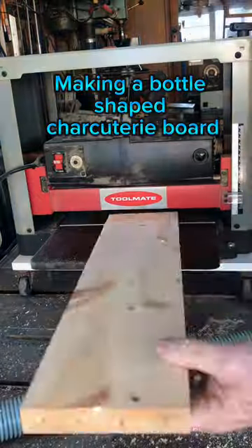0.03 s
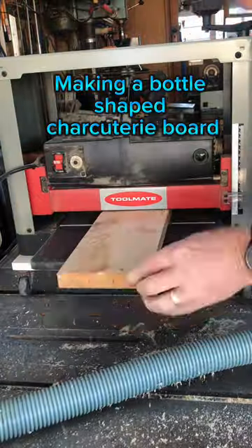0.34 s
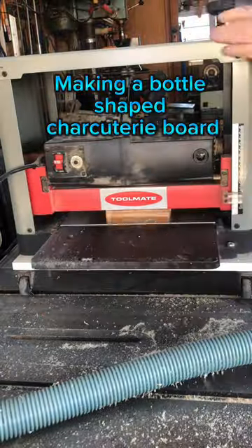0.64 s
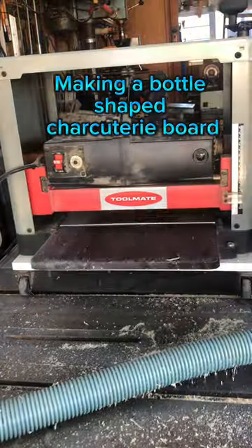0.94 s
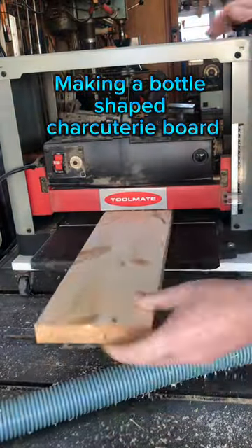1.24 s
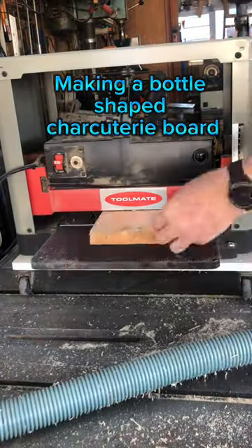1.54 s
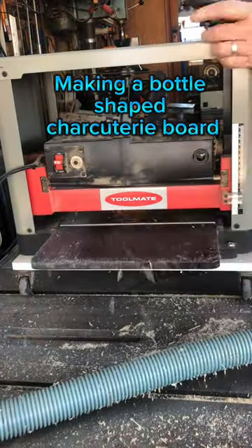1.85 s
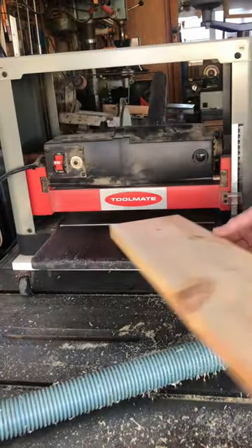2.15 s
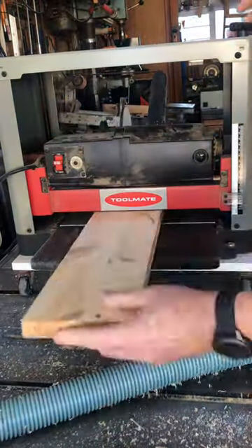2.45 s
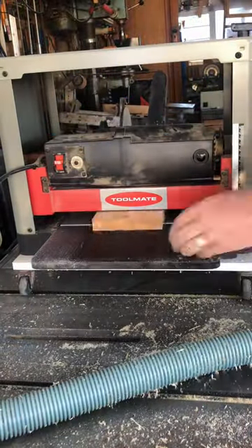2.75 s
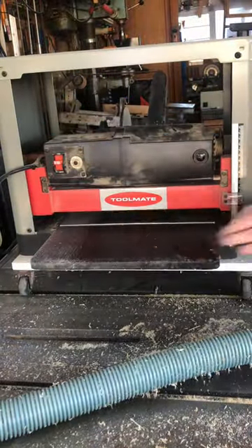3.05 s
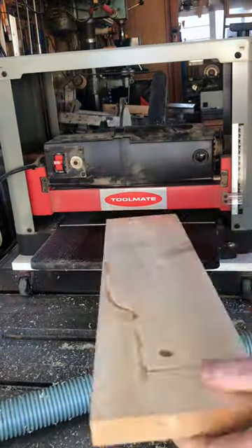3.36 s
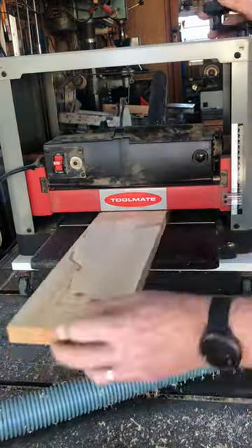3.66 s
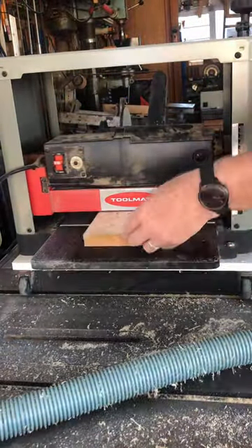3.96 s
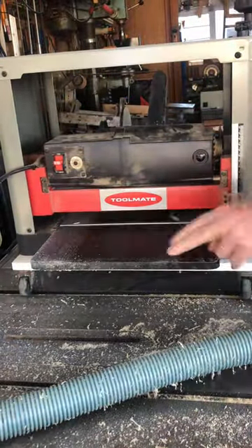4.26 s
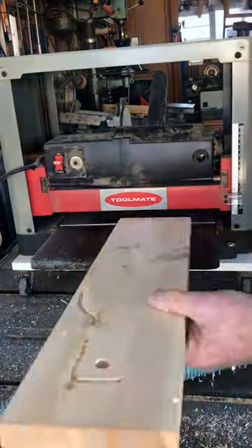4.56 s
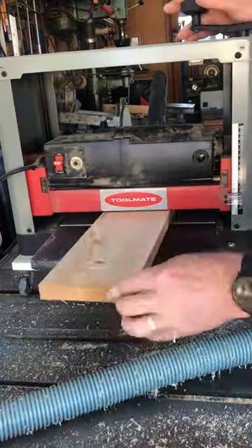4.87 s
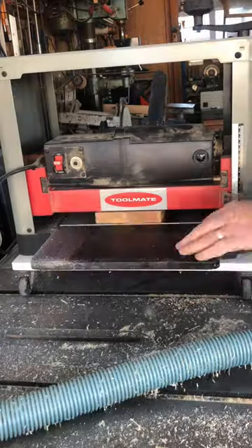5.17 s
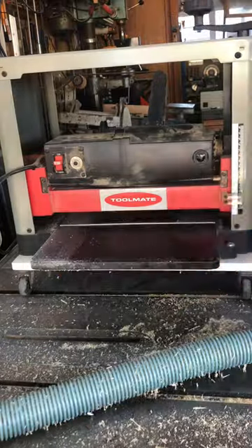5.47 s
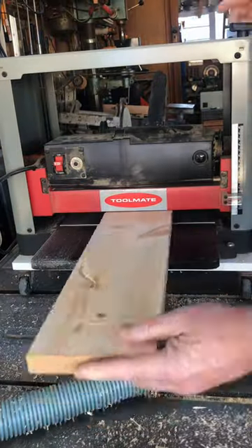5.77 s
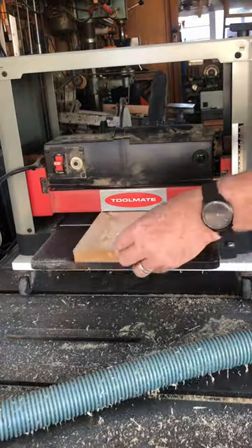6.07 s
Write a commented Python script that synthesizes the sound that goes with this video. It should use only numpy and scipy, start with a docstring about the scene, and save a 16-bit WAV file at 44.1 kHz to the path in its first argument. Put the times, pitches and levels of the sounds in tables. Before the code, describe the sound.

A benchtop wood planer runs in a workshop, sped up so that it whines at a very high pitch over rushing air. Six boards go through in quick succession. Each drags the pitch down for about half a second of shrieking, rasping knives, hissing chips and thin chirping squeals. Between boards the whine climbs and swells back. The sound is mono and close, with very little echo.

```python
"""A wood planer, sped up

Six boards go through a benchtop planer in six seconds, heard in mono. Running free, it whines over a
rush of air. Each board drags the motor down while the spinning knives shriek and spray chips. At this
speed their highest overtones pass half the sample rate and fold back down as criss-crossing chirps."""
import sys
import numpy as np
from scipy import signal
from scipy.fft import rfft, irfft, next_fast_len
from scipy.io import wavfile
from scipy.ndimage import uniform_filter1d

SR = 44100
rng = np.random.default_rng(int(sys.argv[2]) if len(sys.argv) > 2 else 0)


def file_out(sig):
    """Save sig as 16-bit WAV at sys.argv[1]."""
    # one column per channel
    cols = np.atleast_2d(sig).T
    # limit, then scale
    lim = np.clip(cols, -1, 1)
    pcm = np.round(lim * 32767).astype(np.int16)
    wavfile.write(sys.argv[1], SR, pcm)


N = 270774

# The knife rate is the number of knife strikes a second. Levels in the tables are relative.
# Each board's pass, and how far it turns down the free-running sound: start_s, end_s, dip_db
BOARD_PASSES = [(.254, 0.79, 22.5), (1.266, 1.876, 22.5), (2.426, 3.006, 20.5), (3.694, 4.237, 19),
                (4.829, 5.333, 19), (5.851, 6.202, 20)]
# The knife rate with no board, creeping up: time_s, rate_hz
FREE_RATE = [(0, 3385), (1.2, 3410), (2.4, 3427), (3.5, 3450), (4.7, 3469), (6, 3461)]
# The knife rate that the wood pulls towards, one list per board: time_s, rate_hz
CUTTING_RATES = [
    [(0.254, 2795), (0.328, 2668), (0.382, 2471), (0.473, 2725), (0.542, 2435), (0.587, 2526),
     (0.619, 2286), (0.635, 2656), (0.746, 2469), (0.791, 2301)],
    [(1.266, 2810), (1.288, 2433), (1.322, 2453), (1.415, 2264), (1.455, 2487), (1.524, 2557),
     (1.578, 2248), (1.691, 2346), (1.704, 2570), (1.81, 2404), (1.879, 2156)],
    [(2.426, 3018), (2.443, 2545), (2.524, 2374), (2.576, 2333), (2.618, 2543), (2.687, 2574),
     (2.734, 2334), (2.831, 2350), (2.853, 2568), (2.931, 2459), (3.005, 2293)],
    [(3.694, 2996), (3.704, 2397), (3.822, 2441), (3.939, 2436), (3.96, 2647), (3.973, 2720), (4.042, 2701),
     (4.105, 2621), (4.133, 2802), (4.238, 2827)],
    [(4.829, 2718), (4.868, 2784), (4.972, 2536), (5.028, 2488), (5.073, 2731), (5.133, 2635),
     (5.177, 2516), (5.224, 2702), (5.276, 2733), (5.333, 2697)],
    [(5.851, 1898), (5.907, 2420), (5.941, 2362), (5.971, 2410), (6.018, 2241), (6.068, 2325), (6.13, 2316)],
]
# Tones of the spinning block that holds the knives: multiple_of_knife_rate, level_db
CUTTER_TONES = [(1 / 2, -15.6), (1, -2.5), (2, -12), (3, -11.5), (4, -20)]
# Tone of the belt-driven motor: multiple_of_motor_rate, level_db
MOTOR_TONES = [(1, -9.5)]
# Fainter whirrs of the drive: multiple_of_knife_rate, level_db
DRIVE_TONES = [(1.043, -17), (1.305, -14.5)]
# How well the casing passes on the motor and drive: pitch_hz, gain_db
CASING_GAIN = [(2900, -7), (3400, -8.5), (3680, 6.5), (3900, 9), (4400, -1)]
# The tone colour of the rushing air: pitch_hz, level_db
AIR_COLOUR = [(15, -42), (25, -9.5), (241, -10), (333, -9.5), (472, -9.5), (1350, -11), (1680, -8),
              (1820, -10), (3200, -5), (3860, -6.5), (4190, -6), (5790, -10), (8680, -7), (14500, -7.5),
              (15700, -6.5)]
# The cooling blades' whistle at each knife rate: rate_hz, level_db
WHISTLE_LEVELS = [(2800, -10), (3100, 0), (3280, -7), (3450, -12)]
# How loud the parts of a cut are, one list per board: time_s, shriek_db, chips_db, rasp_db
CUT_LEVELS = [
    [(0.255, -18, -10.5, -40.5), (0.368, -24, -23, -35.5), (0.397, -15.5, -12, -45),
     (0.409, -18.5, -18, -37), (0.505, -18.5, -25, -41.5), (0.531, -13.5, -23, -40),
     (0.616, -21, -21.5, -32), (0.647, -22, -28, -40.5), (0.678, -14, -22, -45), (0.787, -21, -16.5, -33.5)],
    [(1.268, -17.5, -14, -34), (1.324, -22, -18.5, -37), (1.348, -18.5, -20, -43),
     (1.414, -21.5, -17.5, -33), (1.475, -21, -24, -38), (1.599, -17, -20.5, -37), (1.644, -18.5, -21, -30),
     (1.67, -23, -19, -35), (1.748, -23.5, -28, -42.5), (1.865, -16, -15, -34), (1.875, -43, -28, -62)],
    [(2.426, -16.5, -12, -37), (2.48, -23.5, -18.5, -37), (2.501, -17, -15.5, -36),
     (2.552, -21, -19, -34.5), (2.644, -20.5, -20.5, -33.5), (2.678, -14.5, -29, -42.5),
     (2.734, -19, -20, -29.5), (2.817, -18.5, -19.5, -36.5), (2.886, -22.5, -24.5, -44),
     (2.908, -21.5, -21, -37.5), (3.001, -20, -15, -34.5)],
    [(3.695, -19.5, -9.5, -40), (3.75, -21, -25.5, -40.5), (3.82, -27.5, -33, -36.5), (3.86, -38, -30, -42),
     (3.878, -27, -16.5, -31), (3.898, -19, -20.5, -45), (4.078, -25, -33.5, -41),
     (4.099, -22.5, -23.5, -39.5), (4.161, -28.5, -27, -44), (4.235, -24, -18.5, -35)],
    [(4.83, -19.5, -13.5, -37.5), (4.885, -28, -22, -41.5), (4.949, -25, -27, -40),
     (4.956, -25.5, -22, -40), (5.046, -19, -23, -45.5), (5.065, -24.5, -33, -44), (5.158, -27, -25, -38),
     (5.193, -22, -23, -45), (5.266, -24.5, -26.5, -48), (5.329, -20.5, -18, -35)],
    [(5.851, -20, -10, -34.5), (5.903, -19.5, -25, -47), (5.955, -30, -23, -39.5),
     (5.966, -23.5, -31.5, -40), (6.097, -22.5, -17.5, -37), (6.124, -38, -20.5, -39)],
]
# Peaks and dips that the shriek slides through: pitch_hz, width_hz, gain_db
SHRIEK_PEAKS = [(4630, 190, 6.5), (4887, 30, -6), (5176, 42, 4.5), (5243, 27, -17), (5145, 130, -1),
                (5740, 83, -35), (7324, 80, 15.5), (7700, 200, -4), (8480, 49, -16), (9670, 350, -6.5),
                (11260, 60, 22), (12370, 110, 9), (12800, 330, 7), (15500, 730, 0)]
# The knives' lowest tone, fading as they slow: rate_hz, level_db
STRIKE_LEVELS = [(2350, -39), (2700, -39), (3000, -37), (3400, -31)]
# Strength of the knives' high overtones: pitch_before_folding_hz, level_db
RASP_COLOUR = [(14000, 1), (30000, -0.5), (36000, 2.5), (42000, 0), (58000, 1), (80000, -10.5),
               (125000, -8), (160000, -4)]
# The tone colour of the flying chips: pitch_hz, level_db
CHIP_COLOUR = [(25, -3), (200, -3), (1200, -3), (2500, -1), (4500, -1.5), (7000, 0), (10000, -3),
               (15500, 2.5)]
# Brief squeals of single overtones: peak_s, fade_s, multiple_of_knife_rate, level_db
SQUEAL_EVENTS = [(0.31, .015, 13, -24), (0.33, 0.014, 14, -22.5), (0.574, 0.021, 16, -26),
                 (.577, 0.022, 15, -26), (0.755, 0.014, 17, -28), (1.351, 0.012, 16, -26),
                 (1.429, 0.025, 18, -28), (1.632, 0.013, 19, -35), (2.581, 0.011, 17, -24),
                 (2.591, 0.016, 18, -31.5), (2.789, 0.011, 18, -21.5), (2.79, .016, 16, -22.5),
                 (2.791, 0.013, 17, -26), (2.924, 0.031, 18, -37), (4.012, 0.053, 14, -37),
                 (4.07, .06, 12, -31), (5.125, 0.13, 12, -26.5), (5.312, 0.013, 16, -41)]

BELT_RATIO, COOLING_BLADES, FAN_HZ = 1.0849, 9, 3930  # the belt ratio is motor rate over knife rate
INERTIA_S, SPIN_UP_S, SPIN_UP_POWER = .05, .22, 3  # how the heavy cutter slows and recovers
EARLIER_EXIT_S, EARLIER_HZ = -.3, 2420  # at the start it is still recovering from an earlier board
AIR_DB, WHINE_DB = -29, -22.5
DIP_S, SWELL_DB_PER_S = .05, 85.5  # the free-running sound sinks fast, then swells back
HUM_LIFT = .35  # the share of that dip which the cutter's lowest hum is spared
SHRIEK_DB, CHIPS_DB, RASP_DB = 1, -3, -1  # added to CUT_LEVELS
GRAIN_DB, GRAIN_PER_S = 2, 45  # changing wood grain makes each overtone swell and fade by itself
RASP_LOW_HZ, TOP_HZ = 70, 15800  # the rasp thins out below the first; all sound stops at the second


def amp(db):
    """Turn decibels into a number to multiply by."""
    return np.exp(np.asarray(db) * (np.log(10) / 20))


def unit(x):
    """Scale a signal to an average strength (rms) of 1."""
    return x / np.sqrt(np.mean(x ** 2) + 1e-20)


def level_at(table, hz):
    """Read a level between a table's rows, on a log frequency scale."""
    table_hz, levels = np.transpose(table)
    return np.interp(np.log(hz + 1), np.log(table_hz), levels)


def curves(rows):
    """Turn each column after the time into one value per sample."""
    times, *columns = np.transpose(rows)
    return [np.interp(np.arange(N) / SR, times, column) for column in columns]


def wobble(per_s):
    """A wandering line of strength 1 through about per_s random points a second."""
    step = int(SR / per_s)
    points = rng.standard_normal((N // step + 2, 1)).astype(np.float32)
    ramp = np.arange(step, dtype=np.float32) / step
    return unit((points[:-1] + np.diff(points, axis=0) * ramp).ravel()[:N])


def filtered(x, gain_at):
    """Turn each frequency up or down by gain_at(hz)."""
    size = next_fast_len(N + 8192)
    return irfft(rfft(x, size) * gain_at(np.fft.rfftfreq(size, 1 / SR)), size)[:N]


def rush(colour, patchy_db):
    """Shaped noise of strength 1, with random louder and softer patches."""
    slices = signal.stft(rng.standard_normal(N), nperseg=512)[2]
    patches = uniform_filter1d(rng.standard_normal(slices.shape), size=5, axis=0)  # smooth over pitch
    patches = uniform_filter1d(patches, size=8, axis=1)  # and over time
    noise = signal.istft(slices * amp(patchy_db * unit(patches)), nperseg=512)[1][:N]
    return unit(filtered(noise, lambda hz: amp(level_at(colour, hz))))


def tone(phase, flutter_db, fuzz):
    """A tone of strength about 1 that flutters in level; fuzz roughens its pitch."""
    return np.sqrt(2) * unit(amp(flutter_db * wobble(45))) * np.sin(phase + fuzz * wobble(350))


def knife_rate():
    """Each board drags the heavy cutter towards a lower speed; once free, it spins up again."""
    t = np.arange(N) / SR
    free_hz, = curves(FREE_RATE)

    def spin_up(exit_s, exit_hz):
        recovery = (1 + np.maximum(t - exit_s, 0) / SPIN_UP_S) ** SPIN_UP_POWER
        return free_hz - (free_hz - exit_hz) / recovery

    hz = spin_up(EARLIER_EXIT_S, EARLIER_HZ)
    follow = 1 / (INERTIA_S * SR)
    for (start, end, _), targets in zip(BOARD_PASSES, CUTTING_RATES):
        cutting = (t >= start) & (t < end)
        entry_hz = hz[cutting][0]
        pull_hz = curves(targets)[0][cutting] - entry_hz
        hz[cutting] = entry_hz + signal.lfilter([follow], [1, follow - 1], pull_hz)
        hz = np.where(t < end, hz, spin_up(end, hz[cutting][-1]))
    return hz


def cutter_whine(phase, dip_db):
    """The spinning knife block whines over a hum at half the knife rate."""
    return sum(amp(db - (k < 1) * HUM_LIFT * dip_db) * tone(k * phase, flutter_db=.9, fuzz=.063 * k)
               for k, db in CUTTER_TONES)


def motor_whirr(knife_hz, phase):
    """The motor and drive turn with the cutter and sound through the casing."""
    shafts = [(k * BELT_RATIO, db) for k, db in MOTOR_TONES] + DRIVE_TONES
    return sum(amp(db + level_at(CASING_GAIN, k * knife_hz)) * tone(k * phase, flutter_db=1, fuzz=.11)
               for k, db in shafts)


def cooling_air(knife_hz, phase):
    """Air rushes and the motor's blades whistle. The whistle folds back, so it falls as they speed up."""
    whistle = tone(COOLING_BLADES * BELT_RATIO * phase, flutter_db=2, fuzz=.3)
    air = amp(7) * rush(AIR_COLOUR, patchy_db=1.03)
    return air + amp(level_at(WHISTLE_LEVELS, knife_hz)) * whistle


def fan(db):
    """A separate fan keeps its own speed whatever the load."""
    phase = 2 * np.pi * FAN_HZ * np.arange(N) / SR + 1.3 * wobble(18)
    return amp(db) * tone(phase, flutter_db=2, fuzz=.15)


def running_free(knife_hz, phase):
    """Cutter, motor and fan whine over the air they stir: faint after a board, then swelling back."""
    t = np.arange(N) / SR
    dip_db = sum(np.interp(t, [start, start + DIP_S, end, end + db / SWELL_DB_PER_S], [0, -db, -db, 0])
                 for start, end, db in BOARD_PASSES)
    cutter = cutter_whine(phase, dip_db)
    motor = motor_whirr(knife_hz, phase)
    air = cooling_air(knife_hz, phase)
    return amp(WHINE_DB + dip_db) * (cutter + motor + fan(db=-10.5)) + amp(AIR_DB + dip_db) * air


def board_contact(bite_s, release_s):
    """1 while a board is under the knives, 0 between boards."""
    t = np.arange(N) / SR
    return sum(np.clip((t - start) / bite_s + .5, 0, 1) * np.clip((end - t) / release_s + .5, 0, 1)
               for start, end, _ in BOARD_PASSES)


def knife_shriek(knife_hz, phase):
    """Tones at 2 to 6 times the knife rate swell and fade as they slide through peaks and dips."""
    multiples, grid_hz = np.arange(2, 7), np.arange(0, SR / 2, 10)
    colour_db = sum(db * np.exp(-((grid_hz - hz) / width) ** 2) for hz, width, db in SHRIEK_PEAKS)
    colour = amp(colour_db) * (grid_hz < TOP_HZ)
    gains = np.array([np.interp(k * knife_hz, grid_hz, colour) * amp(.5 * GRAIN_DB * wobble(GRAIN_PER_S))
                      for k in multiples])
    gains /= np.linalg.norm(gains, axis=0)  # together they keep a steady strength
    return sum(gain * tone(k * phase, flutter_db=2, fuzz=.14) for k, gain in zip(multiples, gains))


def knife_rasp(knife_hz, phase, first_bite):
    """The sharp strikes' high overtones fold back as chirps; as a board enters, a cluster zips out."""
    rasp = np.zeros(N)
    for k in range(7, 46):
        zip_db = 10 * np.exp(-((k - 14) / 2.2) ** 2) - 3.5
        db = level_at(RASP_COLOUR, k * knife_hz) + first_bite * zip_db + GRAIN_DB * wobble(GRAIN_PER_S)
        rasp += amp(db) * tone(k * phase, flutter_db=2.6, fuzz=.17)
    return filtered(rasp, lambda hz: hz / np.hypot(hz, RASP_LOW_HZ))


def chip_spray(first_bite):
    """Flying chips hiss; the hiss is turned down a little while the knives are still fast."""
    return amp(-3.5 * first_bite) * rush(CHIP_COLOUR, patchy_db=2)


def squeals(phase):
    """Hard spots in the wood make single overtones swell and fade."""
    t = np.arange(N) / SR
    return sum(amp(db) * np.exp(-((t - peak_s) / fade_s) ** 2) * tone(k * phase, flutter_db=4, fuzz=.3)
               for peak_s, fade_s, k, db in SQUEAL_EVENTS)


def planing(knife_hz, phase):
    """Knives strike the wood in sharp pulses: a base tone, a shriek, a rasp and a spray of chips."""
    shriek_db, chips_db, rasp_db = curves(np.vstack(CUT_LEVELS))
    phase = phase + .006 * wobble(300)  # the grain makes strikes uneven, blurring high overtones most
    first_bite = np.clip((knife_hz - 2550) / 500, 0, 1)  # 1 while still fast, as a board enters
    shriek = amp(shriek_db + SHRIEK_DB) * knife_shriek(knife_hz, phase)
    strike = amp(level_at(STRIKE_LEVELS, knife_hz)) * tone(phase, flutter_db=1.5, fuzz=.27)
    rasp = amp(rasp_db + RASP_DB) * knife_rasp(knife_hz, phase, first_bite)
    chips = amp(chips_db + CHIPS_DB) * chip_spray(first_bite)
    return shriek + strike + rasp + squeals(phase) + chips + fan(db=-47)


def workshop(x, fade_s, echo_db):
    """Add the room's echo, only a brief smear at this speed."""
    t = np.arange(SR // 8) / SR
    tail = rng.standard_normal(len(t)) * amp(-60 * t / fade_s)
    return x + amp(echo_db) * signal.fftconvolve(x, tail / np.linalg.norm(tail))[:N]


def scene():
    """One knife rate drives both the free whine and the cut; each board fades from one to the other."""
    knife_hz = knife_rate()
    phase = 2 * np.pi * np.cumsum(knife_hz) / SR
    load = np.clip(board_contact(bite_s=.0043, release_s=.0066), 0, 1)
    cut = workshop(load * planing(knife_hz, phase), fade_s=.06, echo_db=-12)
    mono = np.sqrt(1 - load) * running_free(knife_hz, phase) + cut
    return np.array([mono, mono])


def record(dry):
    """Remove everything above TOP_HZ."""
    return np.array([filtered(channel, lambda hz: hz < TOP_HZ) for channel in dry])


dry = scene()
out = record(dry)
file_out(out)
```